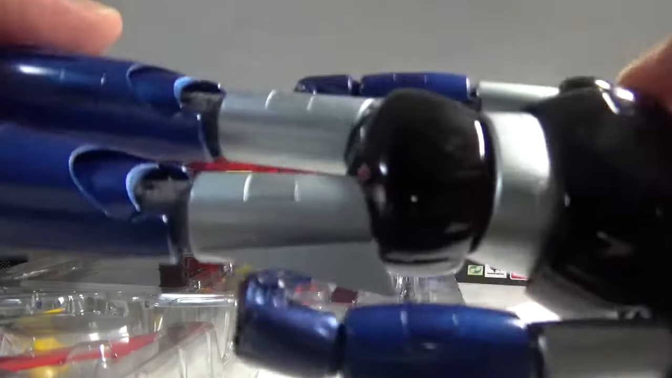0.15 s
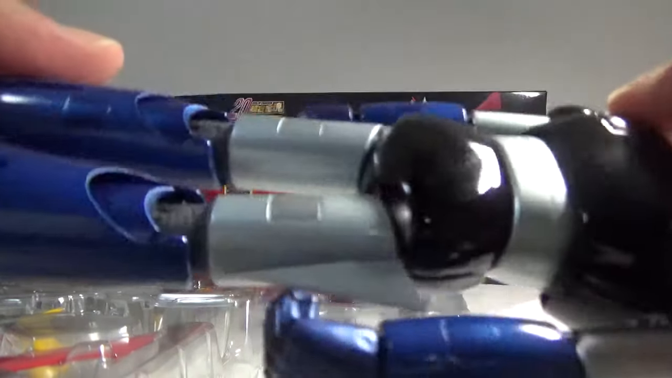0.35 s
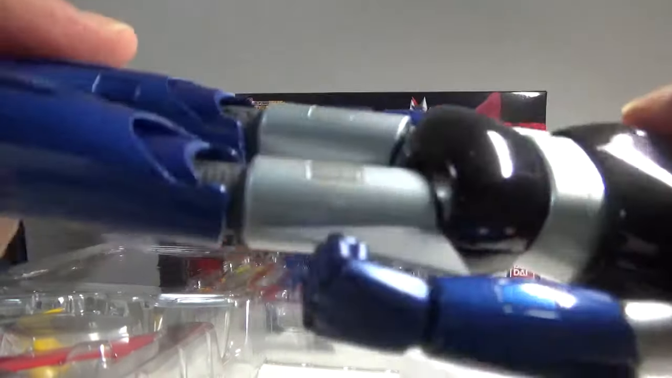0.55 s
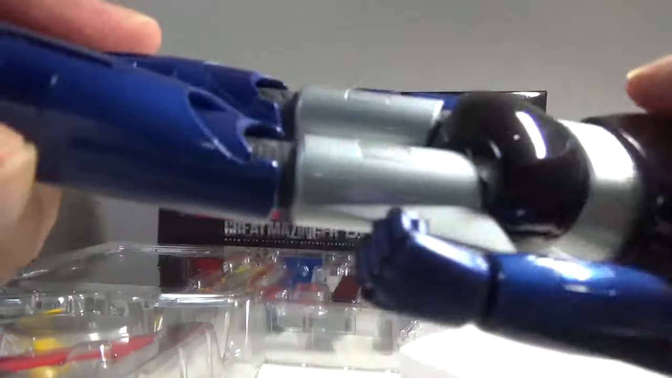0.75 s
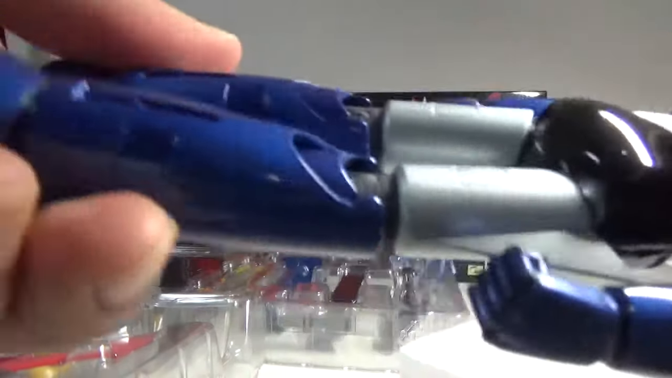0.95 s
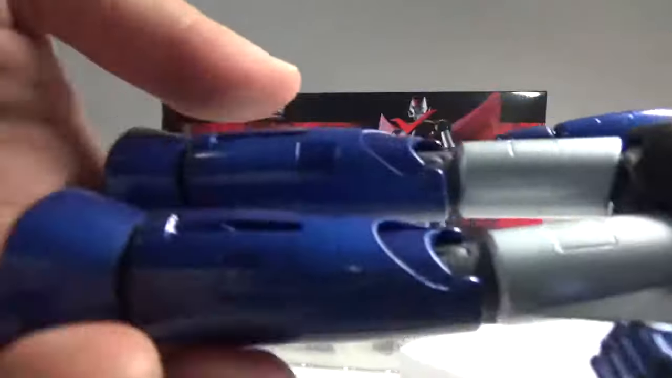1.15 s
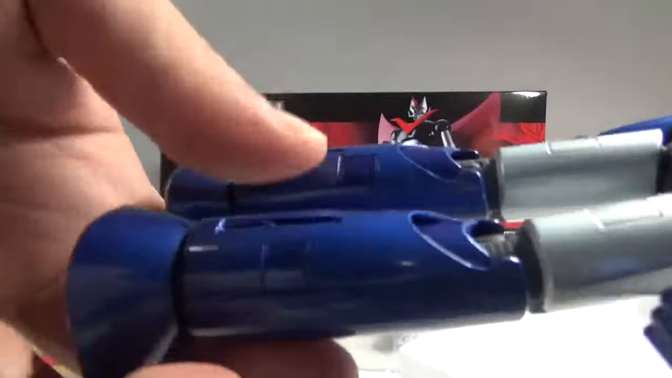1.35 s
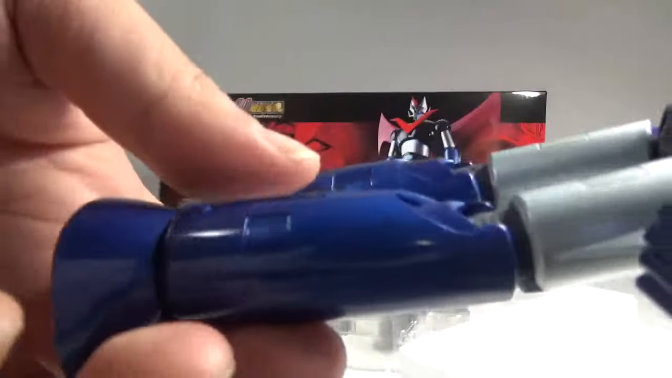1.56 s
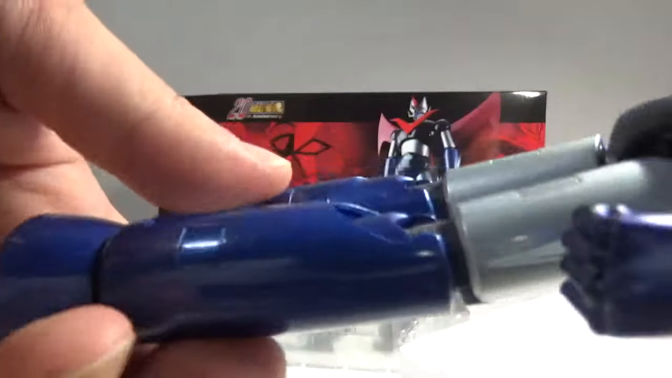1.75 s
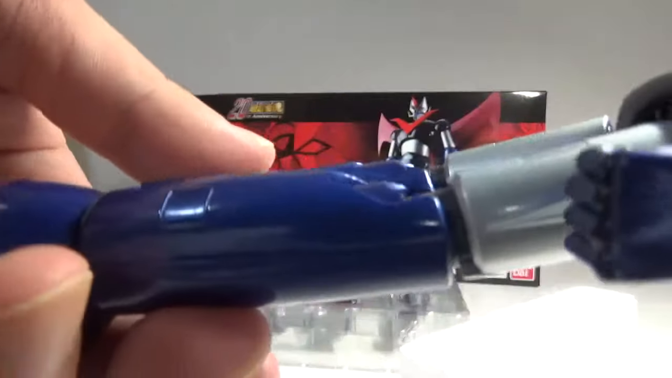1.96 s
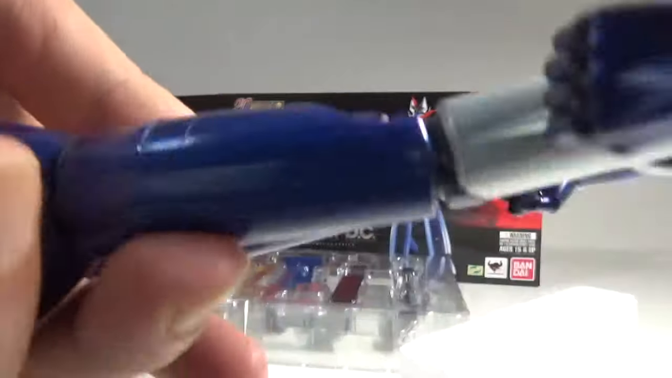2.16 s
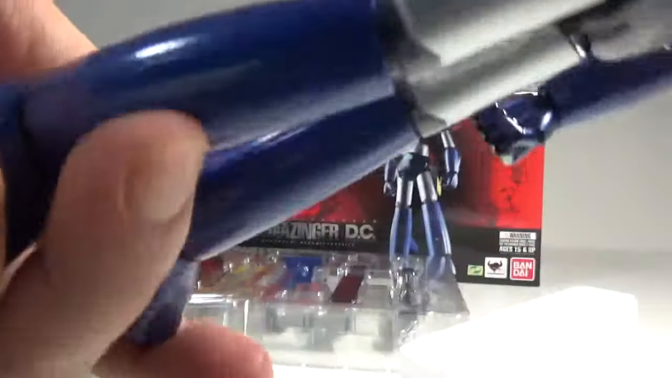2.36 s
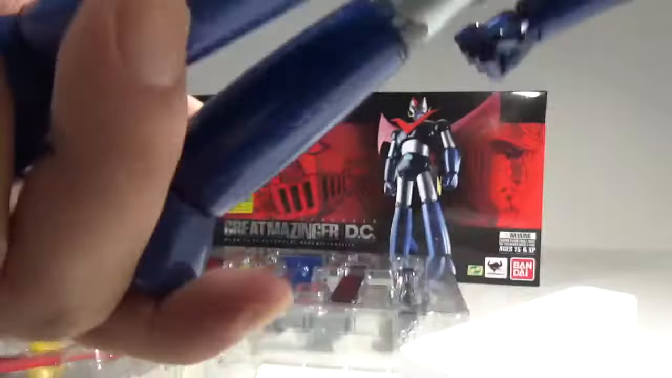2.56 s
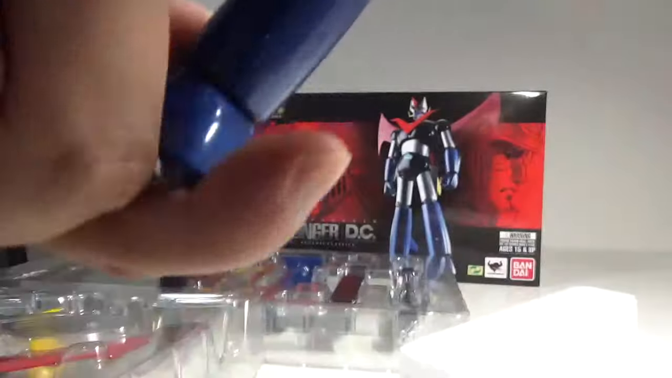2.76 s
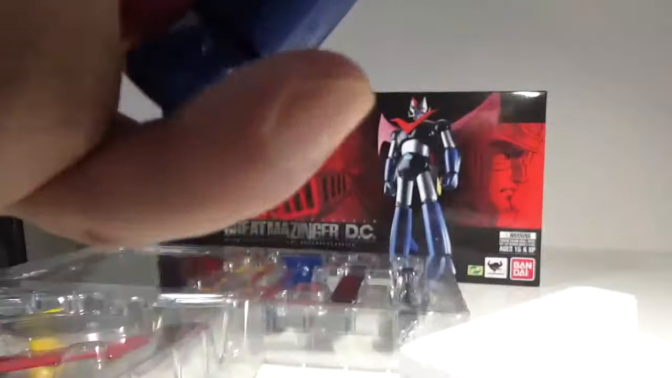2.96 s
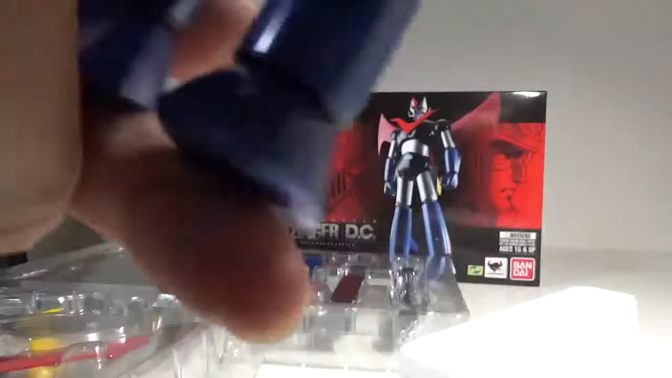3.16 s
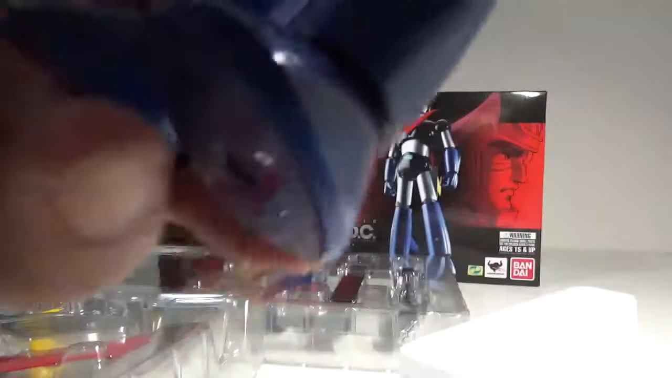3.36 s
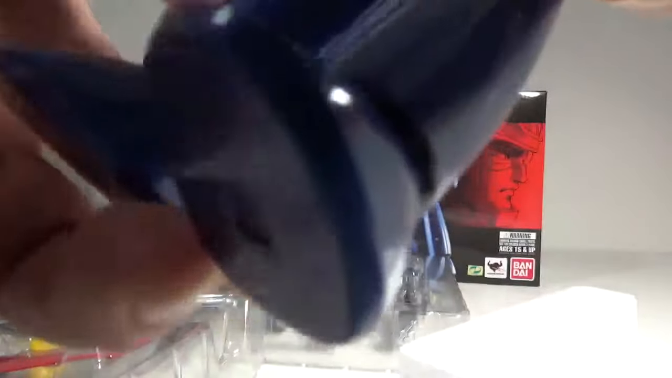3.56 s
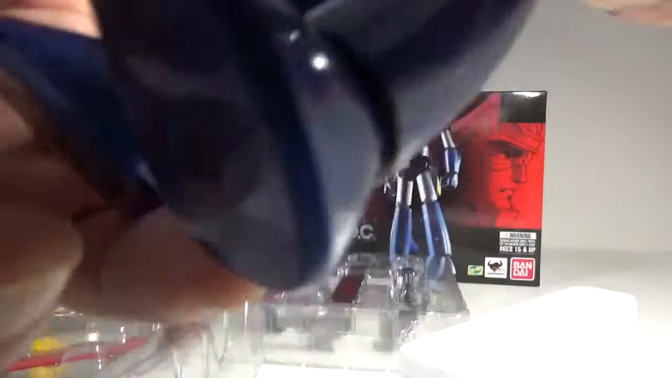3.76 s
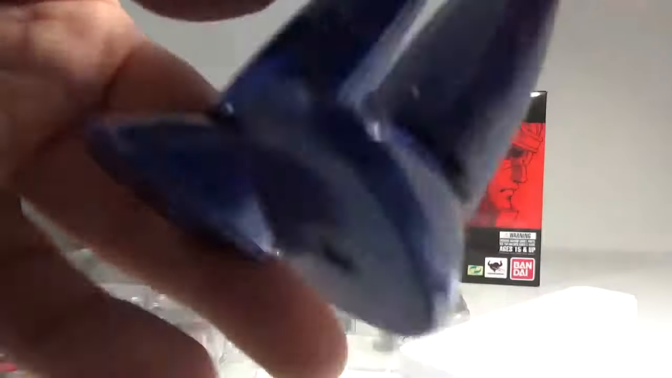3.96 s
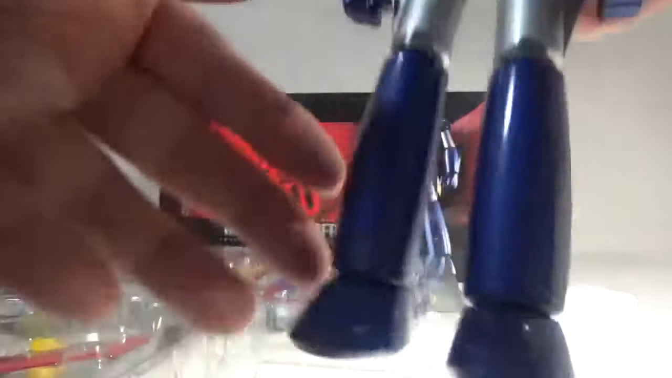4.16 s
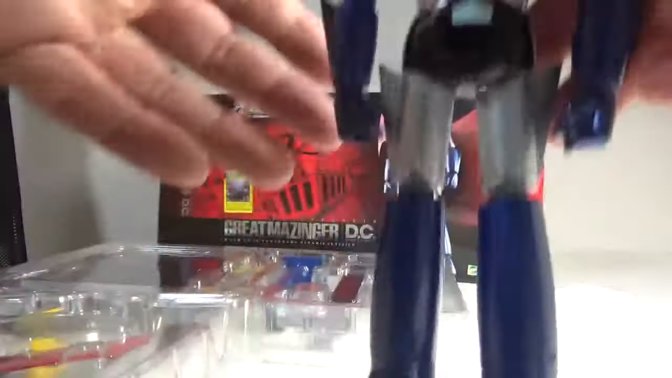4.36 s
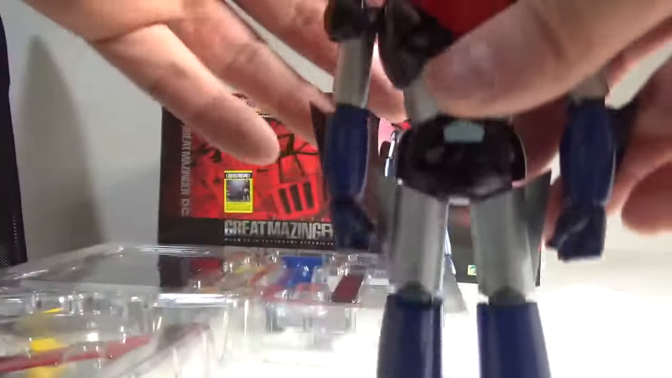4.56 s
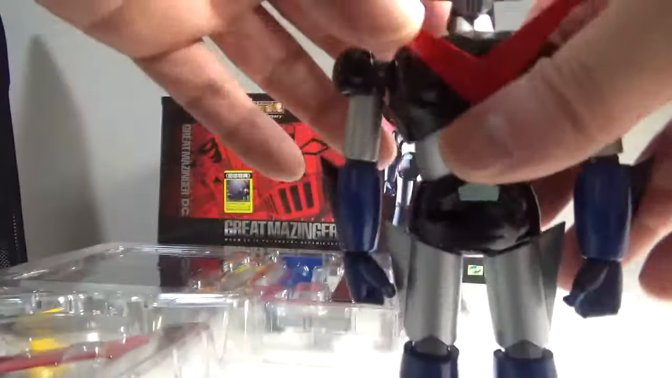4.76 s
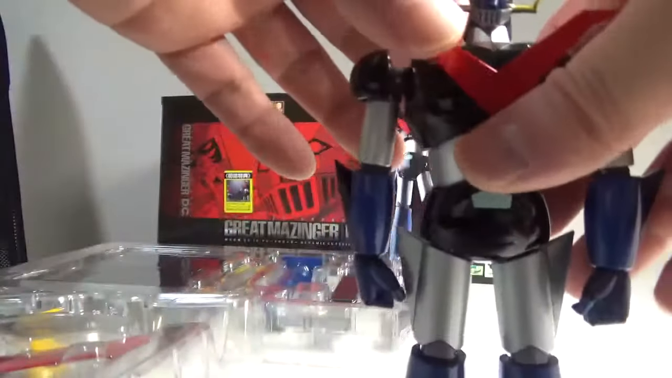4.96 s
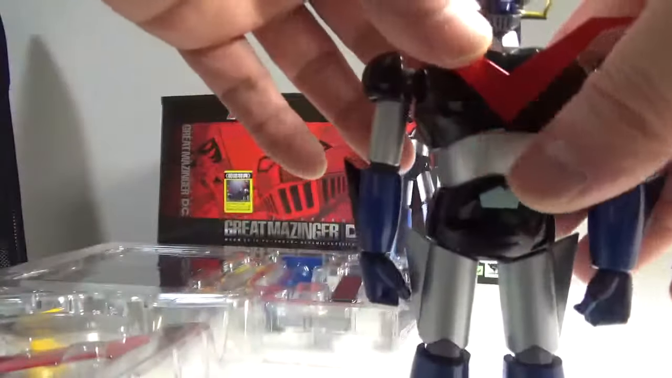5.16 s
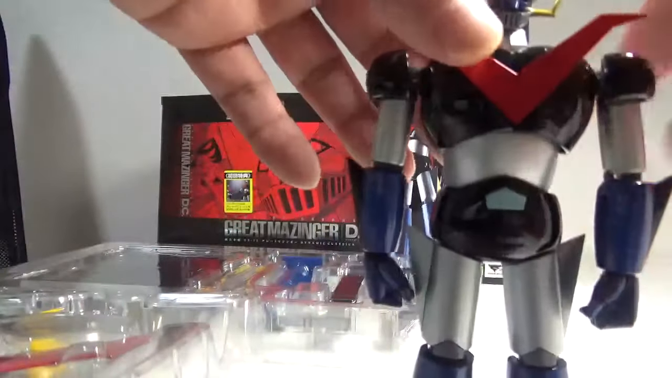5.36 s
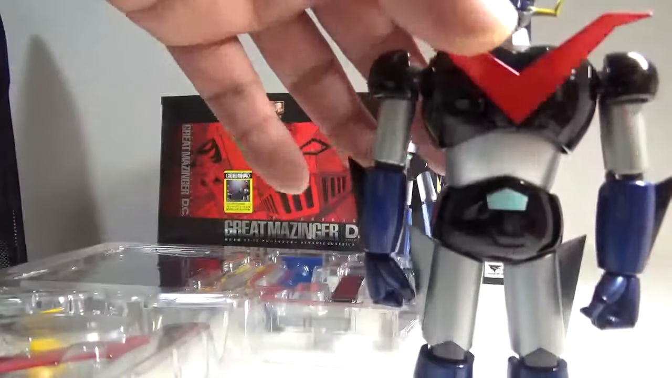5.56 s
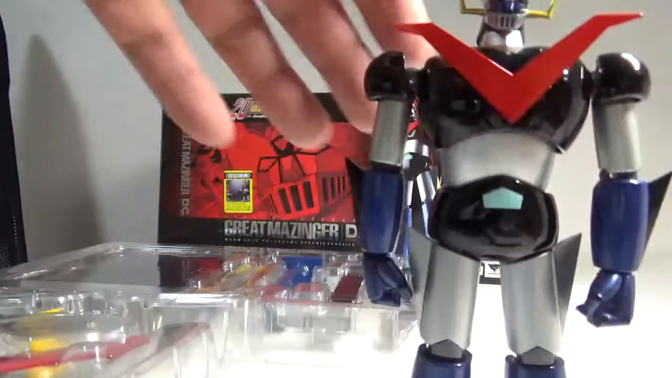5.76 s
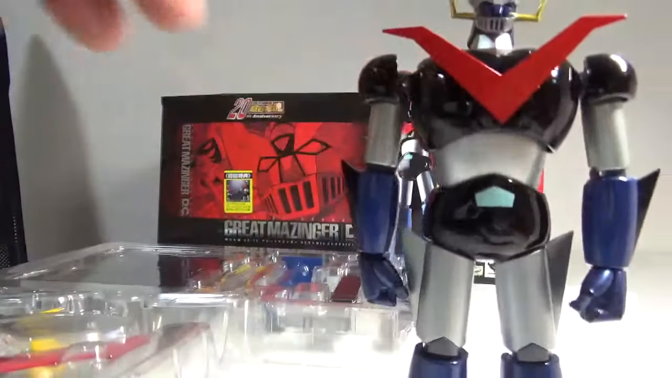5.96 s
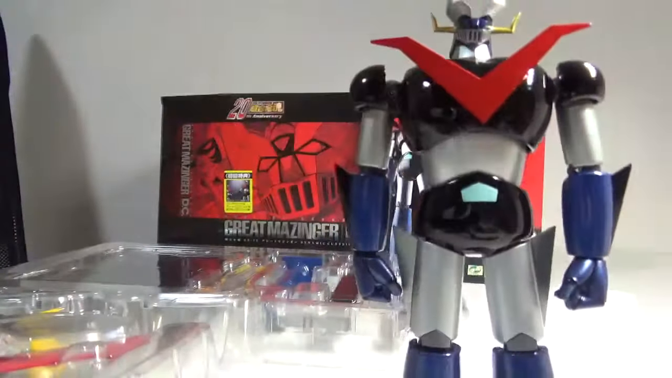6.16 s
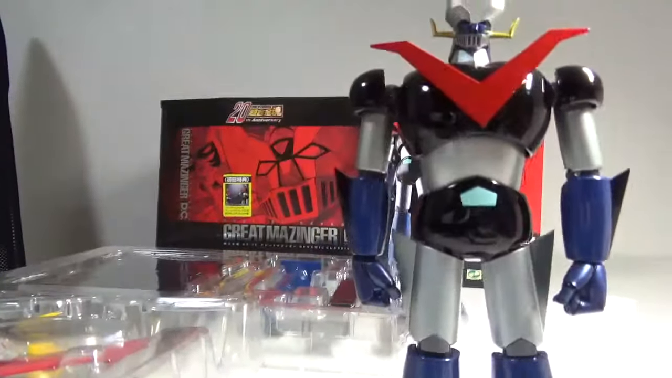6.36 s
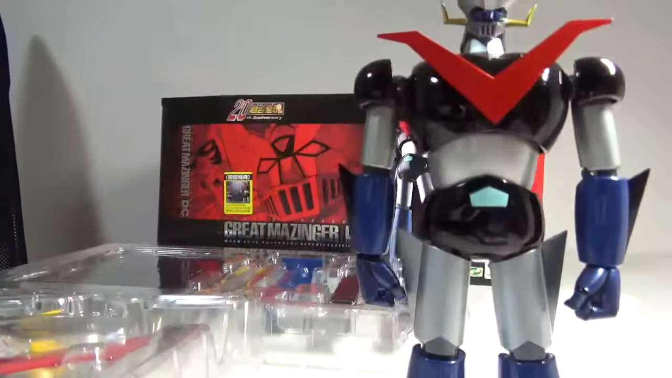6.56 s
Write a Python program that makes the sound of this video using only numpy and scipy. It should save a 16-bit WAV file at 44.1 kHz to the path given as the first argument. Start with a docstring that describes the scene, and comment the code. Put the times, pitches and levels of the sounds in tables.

```python
"""A die-cast toy figure is turned over in the hands, then stood on a table in a small quiet room.
Its limbs strike and ring, its joints ratchet and creak, paint slides on paint in tiny slips.
Its feet knock the tabletop into its modes and shuffle into place; thin plastic buckles and crackles.
Under it all: room rumble, hiss and the faint whine of a camera close by."""
import sys
import numpy as np
from scipy import signal
from scipy.fft import rfft, irfft, next_fast_len
from scipy.io import wavfile

SR = 44100
rng = np.random.default_rng(int(sys.argv[2]) if len(sys.argv) > 2 else 0)


def generate_wav(sig):
    """Save sig (samples, or channels by samples) to the path in sys.argv[1] as 16-bit PCM at SR."""
    pcm = np.round(np.clip(np.atleast_2d(sig).T, -1, 1) * 32767).astype(np.int16)
    wavfile.write(sys.argv[1], SR, pcm)


N = 295456
TIME_S = np.arange(N) / SR

# impacts, with one joint tick at 1.2267 s among them: start_s, level_db, tilt_db_per_octave, nominal_t60_s,
# note_hz, note_offset_db
LIMB_HITS = [(.0141, -48.5, 3, .02, 3430, -11), (.0285, -31, 9.5, 0.0061, 8460, -3.5),
             (.036, -50, 11, 0.023, 8590, -8), (.5807, -49, 2, 0.0064, 7800, 0),
             (.6979, -46.5, 1, 0.017, 9500, -1), (.7605, -35.5, 4.5, 0.0064, 3230, 0),
             (.7622, -32, 3.5, 0.014, 4770, -2.5), (.7655, -39, 6, 0.03, 3764, 0),
             (.78, -31, 10, 0.0068, 9640, -5), (1.1401, -56, 5, 0.015, 8610, 1.5),
             (1.2267, -43, 5, .006, 3630, 1.5), (1.4229, -53.5, 2, 0.012, 9040, -13),
             (1.8549, -43, 2, .018, 5270, -5.5), (2.5597, -51.5, -0.5, 0.026, 8000, -1),
             (2.8674, -28, 8, .022, 9610, -6), (2.9934, -53, 3, 0.012, 5720, -9),
             (3.4283, -54, 9, 0.0071, 5260, 2), (3.4756, -31, 12.5, 0.0042, 5970, -4),
             (4.759, -39.5, 6, .008, 8050, -6), (4.7657, -44.5, 9, 0.009, 9700, -2),
             (4.7727, -29.5, 5.5, 0.014, 9300, -12), (4.9737, -36, 16, 0.011, 9100, -5),
             (5.0681, -37.5, 10.5, 0.016, 5360, -3), (5.3316, -38.5, 10, 0.0084, 9300, 2),
             (6.1527, -47, 4.5, 0.036, 8600, -3)]
PLASTIC_BUCKLES = [(1.7451, -35.5, 2, .018, 1043, -5.5), (6.3473, -43, -1.5, .016, 1900, -2.5),
                   (6.357, -47.5, 3, 0.013, 1290, -6), (6.3862, -52, -3, 0.055, 1860, -12),
                   (6.3966, -40.5, 1, 0.023, 3500, -5.5), (6.4012, -42, 1, 0.011, 1100, -10),
                   (6.4074, -45, 1, 0.026, 2300, -7), (6.5462, -48.5, -4.5, .025, 1290, -8)]
# joint slipping one notch: start_s, level_db, tilt_db_per_octave
NOTCH_SLIPS = [(0.891, -53, -1), (2.2979, -42, 3.5), (2.3695, -55, -3.5), (2.4348, -53.5, -4),
               (2.455, -51, -3), (2.5757, -42.5, 0), (2.6394, -44.5, -1.5), (2.8731, -40.5, 4.5),
               (2.897, -44.5, -1), (2.9266, -55.5, -3), (3.1545, -55, -6)]
# grip shifts that rattle loose parts: start_s, length_s, tick_db
GRIP_SHIFTS = [(0.62, .006, -57), (0.705, 0.027, -51.5), (.93, 0.028, -60), (1.777, .07, -57.5),
               (2.393, 0.022, -59.5), (2.71, 0.007, -62), (4.882, 0.0042, -57), (5.237, .01, -56)]
# feet meeting the table: start_s, force_db, contact_ms, sway_db
FOOT_KNOCKS = [(4.772, -29, 0.17, -70), (4.7742, -6, 0.49, -62), (4.9732, -16, 1.45, -34.5),
               (4.9756, -30.5, 0.15, -67), (5.066, -17.5, 1.36, -51), (5.266, -24, 4, -58),
               (6.153, -28, 3.5, -55), (6.191, -32, 4.6, -58)]

# free modes: pitch_hz, level_db, t60_s
FIGURE_MODES = [(2043, -11.5, 0.029), (2570, -9.5, 0.024), (2730, -25, 0.024), (3570, 3.5, 0.013),
                (3567, -1, 0.032), (3730, -7.5, 0.04), (4860, -5.5, 0.02), (5310, 1.5, 0.033),
                (5880, 5.5, 0.011), (6150, 12.5, 0.0094), (7140, 9, 0.0062), (7750, 5, 0.013),
                (8700, 1, 0.044), (9010, 7.5, 0.013), (8970, -6.5, 0.033), (10290, -4.5, 0.019),
                (10460, -9.5, 0.034)]
PLASTIC_MODES = [(720, -4, 0.028), (1047, 5, 0.019), (1270, 9.5, 0.0091), (1890, 4, 0.012),
                 (2200, -29, 0.011), (3550, 9.5, 0.0045), (4770, -31, 0.023), (6000, -36, .01),
                 (8360, 19, 0.0078), (9600, 17, 0.008)]
TABLE_MODES = [(99, -23, 0.35), (168.6, -14.5, 0.18), (214.3, -14, 0.11), (248, -15.5, 0.12),
               (292.4, -17, 0.22), (345, -13.5, 0.1), (408.2, -20.5, 0.25), (477, -23, 0.17),
               (640, -45, 0.048), (790, -46, 0.067), (871, -16.5, 0.079), (1070, -11, 0.021),
               (1180, -7.5, 0.027), (1362, 2, 0.011), (1630, -4, 0.011), (1983, -4.5, 0.03),
               (2500, -7, 0.038)]
# impact band limits: edge_hz
FIGURE_BANDS_HZ = [1800, 3000, 4300, 7000, 11500]
PLASTIC_BANDS_HZ = [600, 1500, 3000, 7000, 11500]
# weight of each band: gain_db
FIGURE_BANDS_DB = [0, -1, 0, 0]
NOTCH_BANDS_DB = [-3.5, 1.5, -9.5, -0.5]
PLASTIC_BANDS_DB = [-2.8, 1, -2.7, 0.6]

# friction strokes: peak_s, rise_s, fall_s, level_db
PAINT_SLIDES = [(.757, 0.011, 0.0066, -47), (.94, .02, 0.013, -66), (1.18, .015, 0.023, -62),
                (1.79, 0.033, 0.011, -61), (2.556, 0.0047, 0.0067, -53), (3.205, 0.04, 0.047, -43.5),
                (3.467, 0.019, 0.00091, -49.5), (4.02, 0.037, .04, -71), (4.765, 0.0061, .002, -51),
                (4.97, 0.01, 0.0037, -58)]
JOINT_CREAKS = [(.917, 0.0032, .006, -59.5), (1.03, 0.022, 0.02, -64), (1.905, 0.0024, 0.006, -52.5),
                (1.915, 0.0036, 0.0047, -54.5), (3.208, 0.011, 0.0097, -49), (3.295, 0.007, 0.039, -69.5),
                (4.96, 0.0079, 0.018, -64)]
HOLLOW_SCRAPES = [(1.752, 0.0088, 0.0053, -50), (1.79, 0.024, 0.044, -45.5)]
FOOT_SHUFFLES = [(5.19, .035, 0.029, -55), (5.3, 0.037, 0.042, -56.5)]
SKIN_BRUSHES = [(2.76, 0.13, 0.37, -66.5)]
# squeak of the shifting grip: time_s, pitch_hz, level_db
SQUEAK_PATH = [(2.655, 10000, -81), (2.68, 10240, -70), (2.73, 10700, -61), (2.77, 10480, -74),
               (2.82, 10260, -74), (2.86, 10200, -76)]

# spectra: freq_hz, gain_db
SLIDE_SPECTRUM = [(1200, -42), (2100, -12), (2900, -21), (4200, -14), (5400, -11.5), (7600, -9), (8400, 3),
                  (9050, 4.5), (9700, -3.5), (11500, -11.5)]
CREAK_SPECTRUM = [(1300, -14.5), (2100, 1.5), (2800, -8.5), (4500, -14), (5250, 1), (6000, -18),
                  (9000, -5.5), (11500, -24)]
SCRAPE_SPECTRUM = [(70, -19), (130, -2.5), (400, -2), (600, -4), (850, 1), (1100, -7), (1500, -11.5),
                   (2300, -13), (4000, -18)]
SHUFFLE_SPECTRUM = [(40, -31), (110, 3), (170, -2.5), (400, -9), (600, -16.5), (1500, -34)]
BRUSH_SPECTRUM = [(120, -20), (330, 1.5), (550, -1), (900, -16), (1600, -11), (4000, -16.5)]
THUD_SPECTRUM = [(50, -51), (130, 3.5), (350, 7.5), (550, -9), (900, 6), (1300, -27), (2400, -4),
                 (4000, -16.5)]
REVERB_SPECTRUM = [(60, 4), (200, -6.5), (900, -6.5), (2500, -12), (5000, -15), (9000, -17), (12000, -17)]
RUMBLE_HISS_SPECTRUM = [(15, -36), (25, 0.5), (71, 0), (96, -3.5), (128, -1), (223, -1.5), (311, -6),
                        (444, -6.5), (480, -9), (603, -9.5), (979, -13), (3410, -18), (6120, -21),
                        (8100, -18.5), (11000, -24), (14300, -113), (22000, -120)]
# stereo width: freq_hz, side_gain_db
HANDLING_WIDTH = [(60, -46), (250, -27), (500, -13), (1000, -13.5), (2000, -11.5), (4000, -11.5),
                  (8000, -13), (11000, -14.5)]
RUMBLE_HISS_WIDTH = [(60, -20), (110, -18), (190, -13), (350, -6), (620, -1), (1120, 1), (2010, -1.5),
                     (3610, -4), (6480, -5.5), (11600, -10.5)]
# position of the turning figure: time_s, left_minus_right_db
HANDLING_PAN = [(0, 2.5), (.76, -0.5), (1.25, -1.4), (1.8, 2.2), (2.87, -1), (3.45, 1.6), (4.77, -.5),
                (6.4, 0.5)]


def limbs():
    """Hard parts meet with a snap; the struck one rings."""
    snaps = clicks(LIMB_HITS, FIGURE_MODES, FIGURE_BANDS_HZ, FIGURE_BANDS_DB,
                   crack_db=17.5, crack_t60_s=0.0051, free_t60_s=0.038)
    return undb(-1) * snaps + notes(LIMB_HITS, reference_hz=8800)


def joints(ping_hz, scatter, ping_db, nominal_t60_s):
    """A joint drops from notch to notch, each ping slightly detuned."""
    events = [(*slip, nominal_t60_s, ping_hz * (1 + scatter * rng.standard_normal()), ping_db)
              for slip in NOTCH_SLIPS]
    ticks = clicks(events, FIGURE_MODES, FIGURE_BANDS_HZ, NOTCH_BANDS_DB,
                   crack_db=17.5, crack_t60_s=0.01, free_t60_s=0.015)
    return undb(-1.5) * ticks + notes(events, reference_hz=3000)


def loose_parts(ticks_per_s, spread_db, tilt_db_per_octave, nominal_t60_s):
    """Loose parts tick unevenly through each shift of the grip."""
    events = []
    for start_s, length_s, tick_db in GRIP_SHIFTS:
        count = int(np.ceil(length_s * ticks_per_s))
        for k in range(count):
            tick_s = start_s + length_s * (k + rng.random()) / count
            level_db = tick_db + spread_db * rng.standard_normal()
            events.append((tick_s, level_db, tilt_db_per_octave, nominal_t60_s))
    return clicks(events, FIGURE_MODES, FIGURE_BANDS_HZ, FIGURE_BANDS_DB,
                  crack_db=13, crack_t60_s=0.0048, free_t60_s=0.027)


def clicks(events, modes, edges_hz, bands_db, crack_db, crack_t60_s, free_t60_s):
    """Crack plus ringing modes; the grip scales both decays, harder contacts tilt to the treble."""
    out, t = np.zeros(N), np.arange(SR // 6) / SR
    bands = [signal.butter(3, pair, "band", fs=SR, output="sos") for pair in zip(edges_hz, edges_hz[1:])]
    octaves = (np.log2(edges_hz[:-1]) + np.log2(edges_hz[1:])) / 2
    mode_hz, mode_db, mode_t60_s = np.transpose(modes)[:, :, None]
    for start_s, level_db, tilt_db_per_octave, nominal_t60_s, *_ in events:
        detune, phase, strength = rng.standard_normal((3, len(modes), 1))
        decay_scale = nominal_t60_s / free_t60_s
        tones = np.sin(2 * np.pi * (mode_hz * (1 + 0.011 * detune) * t + phase))
        ring = undb(mode_db + 2 * strength) * tones * fade(t, mode_t60_s * decay_scale)
        crack = undb(crack_db) * rng.standard_normal(len(t)) * fade(t, crack_t60_s * decay_scale)
        hit = (ring.sum(0) + crack) * (1 - fade(t, 0.0016))
        shares = undb(bands_db + tilt_db_per_octave * octaves)
        for band, share in zip(bands, shares / np.linalg.norm(shares)):
            add(out, start_s, undb(level_db) * share * unit_onset(signal.sosfilt(band, hit)))
    return out


def notes(events, reference_hz):
    """One mode stands out of each click; its decay time grows with its period."""
    out, t = np.zeros(N), np.arange(SR // 4) / SR
    for start_s, level_db, _, nominal_t60_s, note_hz, offset_db in events:
        envelope = fade(t, nominal_t60_s * reference_hz / note_hz) * (1 - fade(t, 0.0015))
        note = np.sin(2 * np.pi * note_hz * t) * envelope
        add(out, start_s, undb(level_db + offset_db) * unit_onset(note))
    return out


def foot_knocks(thud_db, thud_t60_s, push_gain_db, sway_hz, sway_t60_s, radiate_hz):
    """A half-sine push drives the tabletop; longer contact leaves only the low modes."""
    out, t = np.zeros(N), np.arange(SR // 2) / SR
    board = sum(undb(db) * np.sin(2 * np.pi * hz * t) * fade(t, t60_s) for hz, db, t60_s in TABLE_MODES)
    # slow bending moves little air
    board = signal.sosfilt(signal.butter(2, radiate_hz, "high", fs=SR, output="sos"), board)
    # the figure's weight rocks the table
    sway = np.sin(2 * np.pi * sway_hz * t) * fade(t, sway_t60_s) * (1 - fade(t, 0.025))
    for start_s, force_db, contact_ms, sway_db in FOOT_KNOCKS:
        # weaker modes merge into noise
        thud = undb(thud_db) * noise(len(t), THUD_SPECTRUM) * fade(t, thud_t60_s)
        contact_samples = contact_ms * SR / 1000
        push = np.sin(np.pi * np.minimum(np.arange(SR // 100) / contact_samples, 1))
        knock = signal.fftconvolve(board + thud, push / push.sum())
        add(out, start_s, undb(force_db + push_gain_db) * knock)
        add(out, start_s, undb(sway_db) * sway)
    return out


def thin_plastic():
    """A thin sheet buckles with a dry crack and a brief hollow note."""
    cracks = clicks(PLASTIC_BUCKLES, PLASTIC_MODES, PLASTIC_BANDS_HZ, PLASTIC_BANDS_DB,
                    crack_db=16.5, crack_t60_s=0.025, free_t60_s=0.021)
    return cracks + notes(PLASTIC_BUCKLES, reference_hz=2000)


def friction(strokes, spectrum, slips_per_s, spread_db):
    """Dense tiny slips of uneven size swell and fade with each stroke."""
    slips = (rng.random(N) < slips_per_s / SR) * rng.choice([-1, 1], N)
    slips = slips * undb(spread_db * rng.standard_normal(N))
    envelope = np.zeros(N)
    for peak_s, rise_s, fall_s, level_db in strokes:
        from_peak = (TIME_S - peak_s) / np.where(TIME_S < peak_s, rise_s, fall_s)
        envelope += undb(level_db) / np.cosh(np.clip(1.37 * from_peak, -40, 40))
    return envelope * unit_rms(colour(slips, spectrum))


def squeak(waver_rms_hz, waver_cutoff_hz):
    """Smooth plastic sticks and slips fast enough to whistle; the pitch wavers with pressure."""
    time_s, path_hz, level_db = np.transpose(SQUEAK_PATH)
    lowpass = signal.butter(2, waver_cutoff_hz, fs=SR, output="sos")
    waver = unit_rms(signal.sosfilt(lowpass, rng.standard_normal(N)))
    pitch_hz = np.interp(TIME_S, time_s, path_hz) + waver_rms_hz * waver
    envelope = undb(np.interp(TIME_S, time_s, level_db)) * (TIME_S > time_s[0]) * (TIME_S < time_s[-1])
    return envelope * np.sin(2 * np.pi * np.cumsum(pitch_hz) / SR)


def room(direct, tail_db, tail_t60_s, early_db, early_t60_s):
    """Early reflections and a short room tail reach two close microphone ports."""
    t = np.arange(SR // 2) / SR
    early, tail = rng.standard_normal((2, len(t)))
    early = early * fade(t, early_t60_s) * (t > 0.002)
    tail = colour(tail, REVERB_SPECTRUM) * fade(t, tail_t60_s) * (t > 0.007)
    echoes = undb(early_db) * early / np.linalg.norm(early) + undb(tail_db) * tail / np.linalg.norm(tail)
    reflected = signal.fftconvolve(direct, echoes)[:N]
    mid = direct + reflected
    # port difference is in quadrature; reflections come more from the sides
    quadrature = signal.hilbert(direct - 2 * reflected, next_fast_len(N)).imag[:N]
    side = colour(quadrature, HANDLING_WIDTH)
    return np.array([mid + side, mid - side])


def background(floor_db, whine_hz, whine_width_hz, whine_db):
    """Room rumble shared by both ports, hiss, and the camera's narrow whine."""
    mid = undb(floor_db) * noise(N, RUMBLE_HISS_SPECTRUM)
    side = colour(undb(floor_db) * noise(N, RUMBLE_HISS_SPECTRUM), RUMBLE_HISS_WIDTH)
    resonance = signal.iirpeak(whine_hz, whine_hz / whine_width_hz, SR)
    mid += undb(whine_db) * unit_rms(signal.lfilter(*resonance, rng.standard_normal(N)))
    return np.array([mid + side, mid - side])


def undb(db):
    """Decibels to gain."""
    return 10 ** (np.asarray(db) / 20)


def unit_rms(x):
    """Scale to rms 1."""
    return x / np.sqrt(np.mean(x ** 2) + 1e-30)


def unit_onset(x):
    """Scale to standard deviation 1 over the first 10 ms."""
    return x / np.std(x[:SR // 100])


def fade(t, t60_s):
    """Exponential decay, 60 dB down at t60_s."""
    return np.exp(-np.log(1000) * t / np.maximum(t60_s, 1e-3))


def colour(x, spectrum):
    """Filter by a (freq_hz, gain_db) curve."""
    hz, db = np.transpose(spectrum)
    bins_hz = np.maximum(np.fft.rfftfreq(2 * len(x), 1 / SR), 1)
    gain = undb(np.interp(np.log(bins_hz), np.log(hz), db))
    return irfft(rfft(x, 2 * len(x)) * gain)[:len(x)]


def noise(samples, spectrum):
    """Coloured noise, rms 1."""
    return unit_rms(colour(rng.standard_normal(samples), spectrum))


def add(track, start_s, sound):
    """Mix a sound in at start_s."""
    i = int(start_s * SR)
    track[i:i + len(sound)] += sound[:N - i]


def scene():
    """Clicks, knocks, crackles and friction, panned in the room over the background."""
    figure = limbs() + joints(ping_hz=3530, scatter=0.0088, ping_db=-3.5, nominal_t60_s=0.012)
    figure += loose_parts(ticks_per_s=62, spread_db=4.5, tilt_db_per_octave=4.4, nominal_t60_s=0.02)
    feet = foot_knocks(thud_db=-12, thud_t60_s=0.15, push_gain_db=-7.5,
                       sway_hz=61.5, sway_t60_s=0.24, radiate_hz=86)
    rubbing = friction(PAINT_SLIDES, SLIDE_SPECTRUM, slips_per_s=1600, spread_db=1.5)
    rubbing += friction(JOINT_CREAKS, CREAK_SPECTRUM, slips_per_s=1000, spread_db=3)
    rubbing += friction(HOLLOW_SCRAPES, SCRAPE_SPECTRUM, slips_per_s=1200, spread_db=2)
    rubbing += friction(FOOT_SHUFFLES, SHUFFLE_SPECTRUM, slips_per_s=1600, spread_db=2)
    rubbing += friction(SKIN_BRUSHES, BRUSH_SPECTRUM, slips_per_s=1400, spread_db=1)
    rubbing += squeak(waver_rms_hz=70, waver_cutoff_hz=200)
    direct = figure + feet + thin_plastic() + rubbing
    handling = room(direct, tail_db=-18.5, tail_t60_s=0.25, early_db=-12.5, early_t60_s=0.036)
    pan_db = np.interp(TIME_S, *np.transpose(HANDLING_PAN))
    handling *= undb(np.array([pan_db, -pan_db]) / 2)
    return handling + background(floor_db=-63, whine_hz=7930, whine_width_hz=46, whine_db=-81.5)


def record(dry):
    """The camera cuts the deepest rumble and, steeply, the top."""
    highpass = signal.butter(3, 31, "high", fs=SR, output="sos")
    lowpass = signal.ellip(8, 0.2, 60, 11050, fs=SR, output="sos")
    return signal.sosfilt(lowpass, signal.sosfilt(highpass, dry))


dry = scene()
out = record(dry)
generate_wav(out)
```